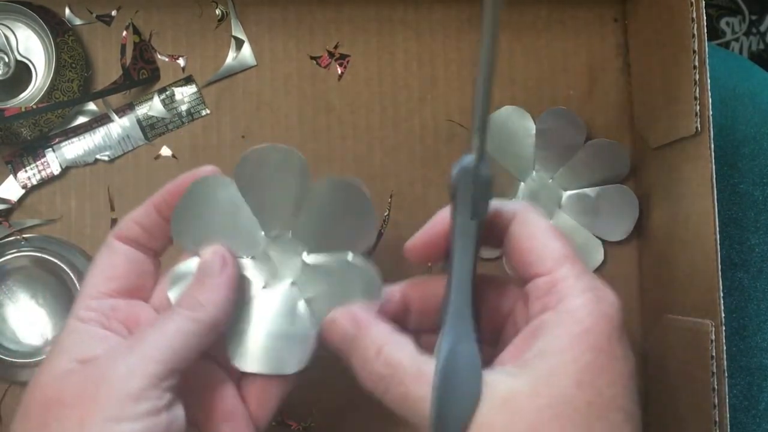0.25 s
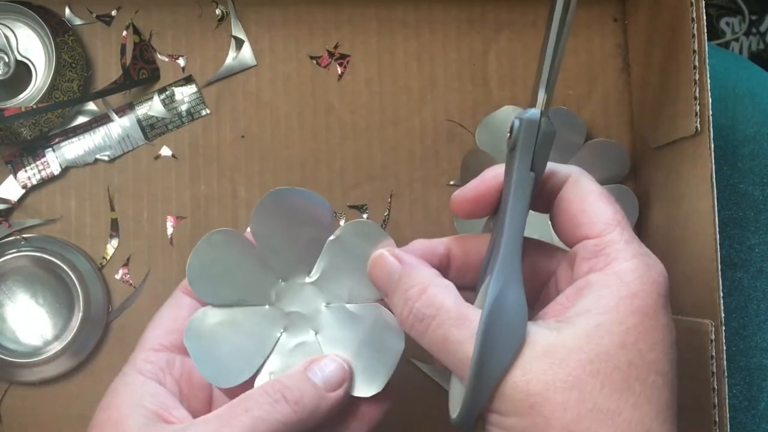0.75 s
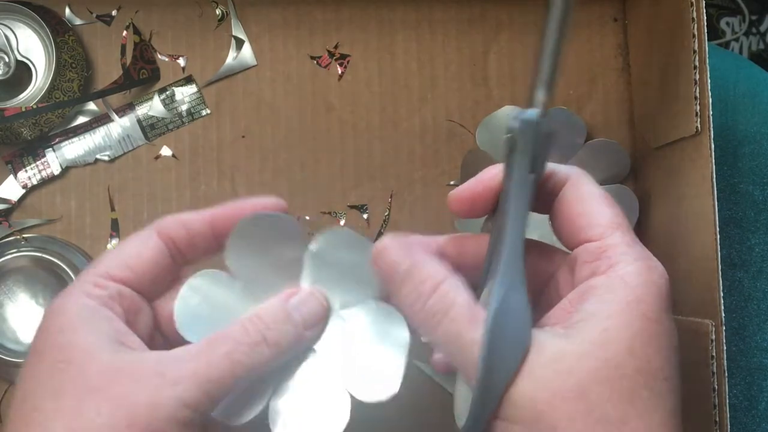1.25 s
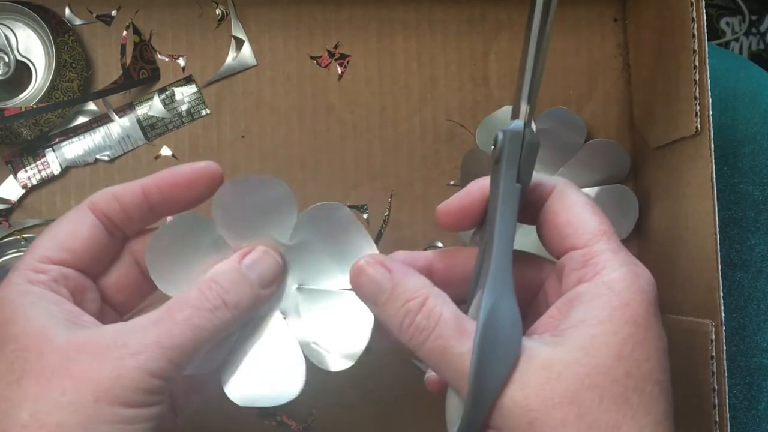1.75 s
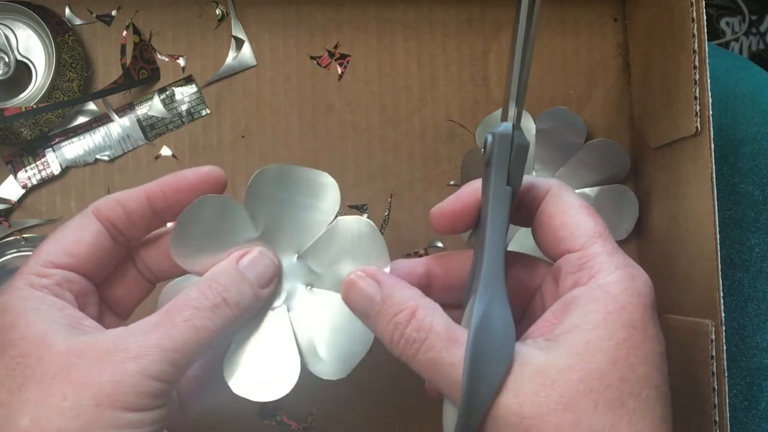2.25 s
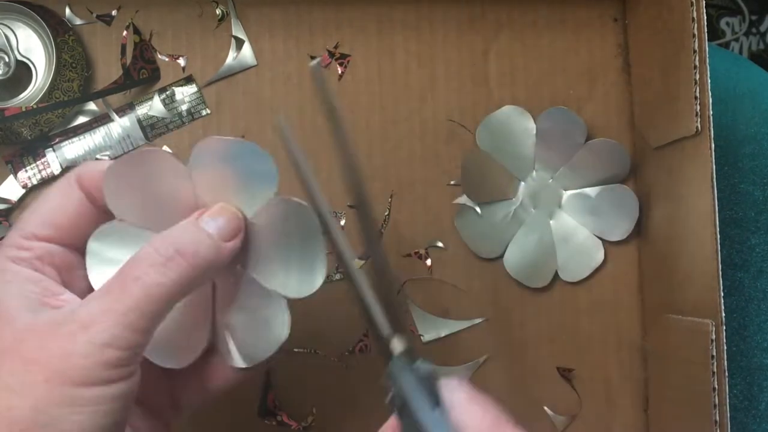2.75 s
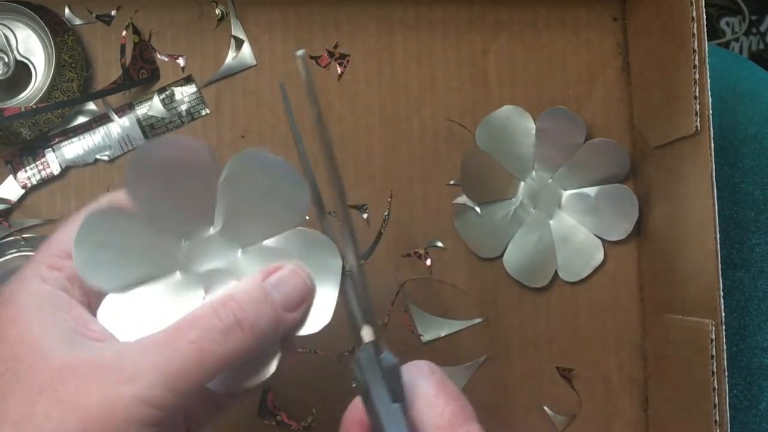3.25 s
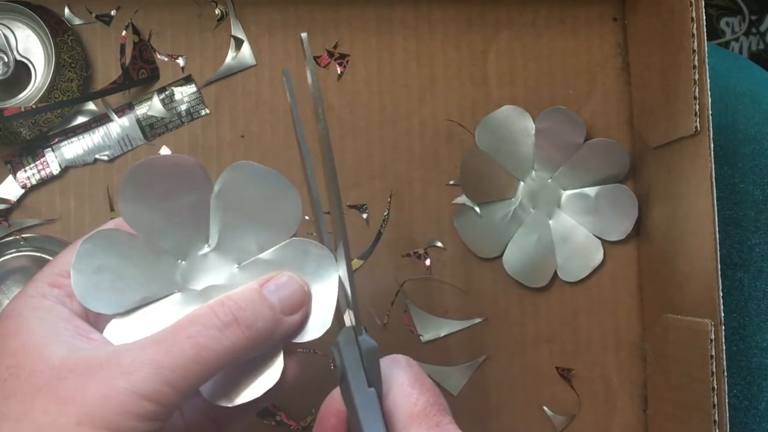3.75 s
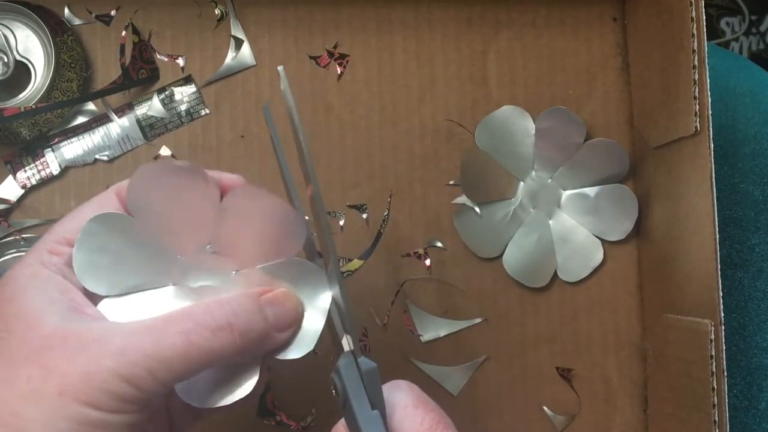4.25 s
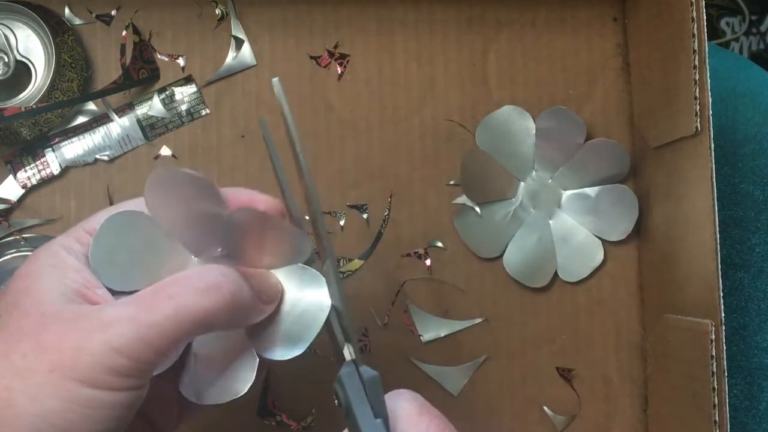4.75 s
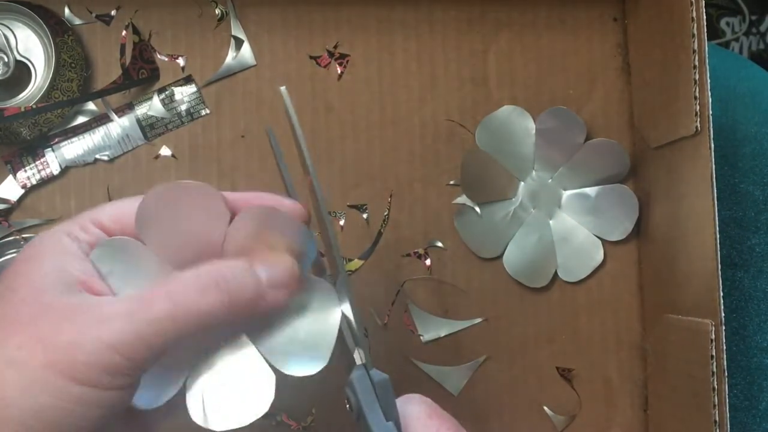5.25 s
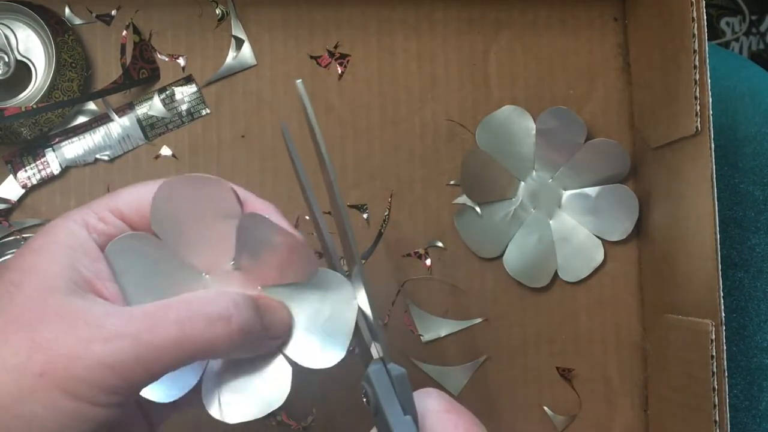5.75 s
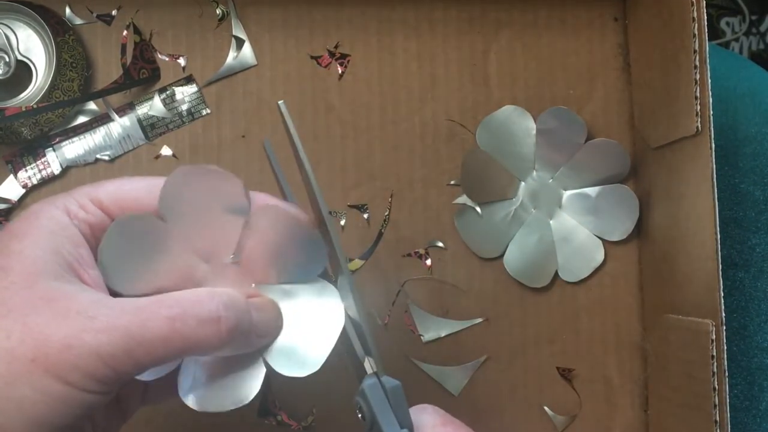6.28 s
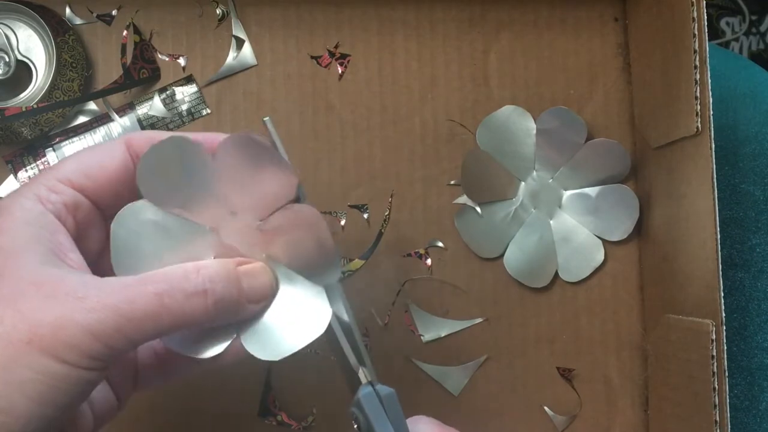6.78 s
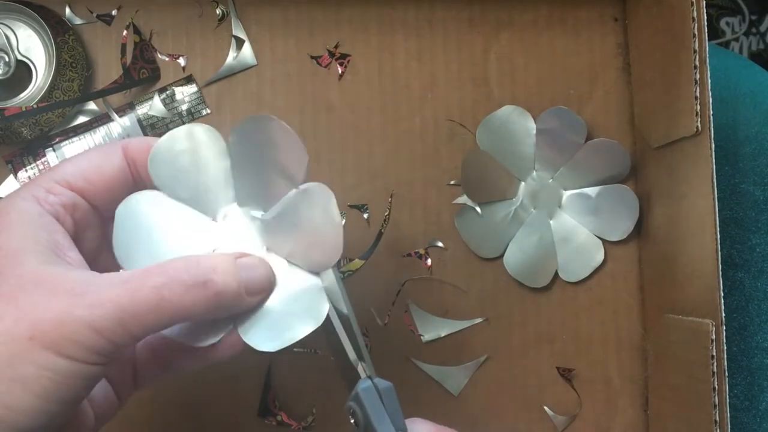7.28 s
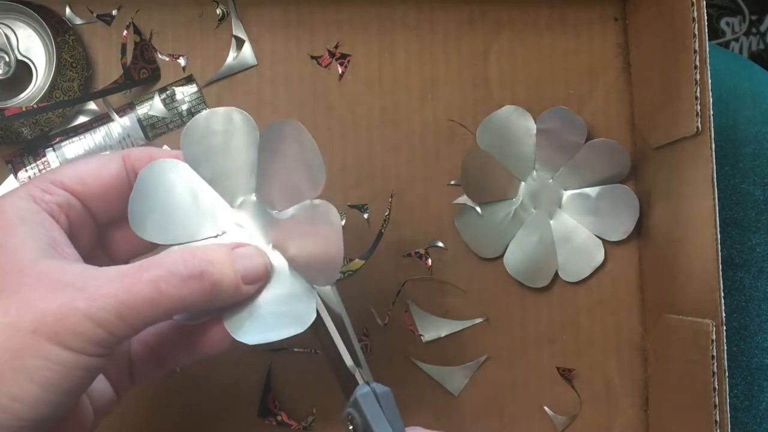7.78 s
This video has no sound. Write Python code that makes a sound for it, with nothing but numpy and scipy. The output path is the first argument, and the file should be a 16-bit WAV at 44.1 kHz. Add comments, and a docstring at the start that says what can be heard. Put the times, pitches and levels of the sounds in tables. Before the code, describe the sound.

Close up in a quiet room with a steady low drone and faint wavering hum, thin aluminium is handled and trimmed with scissors. Sparse light ticks come first, then a busy clatter of snaps and rubs near three seconds with a soft hand drag and dull bump on cardboard. Fine crackling follows, one very loud snip, a few strong snaps, and finally ratchety blade clicks.

```python
"""A steady drone and a low, wavering hum fill a quiet room; thin aluminium rubs and crackles at once.
Hands turn a flower of the sheet over a cardboard tray and trim its petals with scissors: snaps, ticks
and rubs drive shared resonances of sheet and scissors, and the tray adds a short diffuse echo.
Skin slides on the cardboard and a hand bumps the table as a low decaying swing; near the end the
blades pry through in stick-slip, each slip a click that rings decaying modes."""
import sys
import numpy as np
from scipy import signal
from scipy.fft import rfft, irfft, next_fast_len
from scipy.io import wavfile

SR = 44100
rng = np.random.default_rng(int(sys.argv[2]) if len(sys.argv) > 2 else 0)


def bounce(signal):
    """Save signal as a 16-bit WAV file at the path given by the first command-line argument."""
    frames = np.transpose(np.atleast_2d(signal))
    limited = np.clip(frames, -1, 1)
    pcm = np.round(limited * 32767).astype(np.int16)
    wavfile.write(sys.argv[1], SR, pcm)


N = 353682

# Upper resonances of sheet and scissors: (frequency [Hz], width [Hz], level [dB])
UPPER_MODES = [(5477, 630, 1.5), (5630, 170, -3), (5840, 300, -4.5), (6340, 100, 0.5), (6650, 530, 1),
               (7040, 200, -2.5), (7470, 290, 0)]


def amp(db):
    """Logarithmic level: 20 dB is a factor of ten in amplitude."""
    return 10 ** (np.asarray(db) / 20)


def rms_one(x):
    """Power normalisation: scale to rms 1."""
    return x / np.sqrt(np.mean(x ** 2) + 1e-20)


def level_in_time(rows):
    """Linear interpolation of (time [s], level [dB]) to one level per sample."""
    times, levels_db = np.transpose(rows)
    return np.interp(np.arange(N) / SR, times, levels_db)


def drift(rate_hz):
    """Slow random modulation: noise through two equal low-pass poles, rms 1."""
    step = 200     # samples
    steps = rng.standard_normal(N // step + 2)
    r = np.exp(-2 * np.pi * rate_hz * step / SR)
    slow = signal.lfilter([1], [1, -2 * r, r * r], steps)
    return np.interp(np.arange(N) / step, np.arange(len(steps)), rms_one(slow))


def resonate(x, hz, width_hz):
    """Damped resonance: a pole pair; steady white noise of rms 1 comes out at rms 1."""
    r = np.exp(-np.pi * width_hz / SR)
    gain = np.sqrt((1 - r * r) / 2)
    poles = [1, -2 * r * np.cos(2 * np.pi * hz / SR), r * r]
    return signal.lfilter([gain, 0, -gain], poles, x + 1e-18)     # the offset avoids denormals


def grit():
    """Friction noise: tiny slips of uneven size give noise with sharp outliers."""
    spread_db = 3.14
    size_db = spread_db * np.minimum(rng.exponential(1, N), 6.5)
    return rms_one(rng.standard_normal(N) * amp(size_db))


def stroke(height, length):
    """Sliding contact: samples and envelope of a force that swells and lets go."""
    swell = 0.58 * length     # part before the height
    first = max(round((height - swell) * SR), 0)
    at = np.arange(first, round((height - swell + length) * SR))
    return at, np.interp(at / SR - height, [-swell, 0, length - swell], [0, 1, 0])


def room():
    """Spectral shaping and resonance: coloured noise, its steady bands and a wavering hum."""
    # Noise colour: (frequency [Hz], relative density [dB per Hz])
    noise_colour = [(20, -15.5), (55, 2), (75, -1), (105, -9), (150, -3), (330, -5), (450, -13), (700, -9),
                    (1250, -19.5), (2800, -29.5), (7600, -32), (12000, -33), (15600, -39.5)]
    # Noise rms: (time [s], level [dB])
    noise_level = [(0, -57), (.8, -60), (2, -59.5), (2.84, -58), (4.1, -59.5), (8.02, -58.5)]
    # Drone bands: (frequency [Hz], width of each of two passes [Hz], rms level [dB])
    drone_bands = [(648, 100, -62.5), (569, 33, -69), (1072, 240, -73), (2027, 1300, -77), (3290, 330, -80),
                   (4390, 180, -84), (9660, 520, -81), (10860, 450, -92)]
    # Hum tones: (frequency [Hz], rms level before the waver [dB])
    hum_tones = [(120, -67), (179, -69), (240, -69), (302, -80.5)]
    hum_waver_db = 2.5

    size = next_fast_len(N)
    bins_hz = np.maximum(np.arange(size // 2 + 1) * SR / size, 1)
    points_hz, density_db = np.transpose(noise_colour)
    colour = amp(np.interp(np.log(bins_hz), np.log(points_hz), density_db))
    noise = rms_one(irfft(rfft(rng.standard_normal(size)) * colour, size)[:N])

    white, drone = rng.standard_normal(N), np.zeros(N)
    for hz, width_hz, db in drone_bands:
        band = resonate(resonate(white, hz, width_hz), hz, width_hz)
        drone += amp(db) * rms_one(band)

    t, hum = np.arange(N) / SR, np.zeros(N)
    for hz, db in hum_tones:
        level = np.sqrt(2) * amp(db + hum_waver_db * drift(2.0))
        hum += level * np.sin(2 * np.pi * hz * t + 1.2 * drift(2.5))
    return amp(level_in_time(noise_level)) * noise + drone + hum


def crackle():
    """Shot noise: sparse random ticks of the held sheet, each a few milliseconds of force."""
    # Tick force: (time [s], level [dB])
    tick_level = [(0, -76), (3.5, -94), (4.1, -68), (5.9, -69), (6.1, -70), (6.45, -76), (6.9, -88),
                  (7.15, -75), (8.02, -75)]
    ticks_per_s, decay_s = 78, .003
    born = (rng.random(N) < ticks_per_s / SR) * amp(2.8 * rng.standard_normal(N))
    r = np.exp(-1 / (decay_s * SR))
    return amp(level_in_time(tick_level)) * signal.lfilter([1], [1, -r], born)


def mode_shares(modes, favoured_hz):
    """Modal excitation: how each contact (rows) spreads its power over the modes (columns)."""
    favour_db, favour_octaves = 8.5, 0.13     # the grip leaves some modes free to ring
    chance_db = 3
    hz, _, db = np.transpose(modes)
    octaves_away = np.log2(hz / np.array(favoured_hz)[:, None])
    near = np.exp(-(octaves_away / favour_octaves) ** 2)
    gains_db = db * (1 - near) + favour_db * near
    gains = amp(gains_db + chance_db * rng.standard_normal(near.shape))
    return gains / np.sqrt(np.sum(gains ** 2, axis=1, keepdims=True))


def group_levels(db, bright_db, knock_db, favoured_hz):
    """Contact stiffening: low, middle, upper and top levels [dB]; harder contacts reach higher."""
    usual_db, top_per_db = -45, 0.1985     # top modes equal upper ones at the usual level
    # a favoured top mode draws level from the upper modes to the top ones
    lean_db = 2.5 * (favoured_hz > UPPER_MODES[-1][0])
    top_db = db + lean_db + top_per_db * (db - usual_db)
    return [db + knock_db, db - bright_db, db - lean_db, top_db]


def metal():
    """Modal synthesis: snips snap, tear and die away, strokes rub; all drive the same modes."""
    # Snips and ticks: (time [s], level [dB], upper over middle modes [dB],
    # low modes over the level [dB], favoured mode [Hz], force die-away t60 [s])
    cuts = [(0.219, -44.5, 10, -26, 7370, 0.041), (1.1658, -44, 2.5, -5.5, 6400, 0.058),
            (1.1862, -49.5, 1, -27, 6590, 0.047), (1.207, -42, 0, -7, 3440, 0.038),
            (2.292, -57, 12, -30, 10100, .035), (2.4278, -49, 7, -25, 8900, 0.049),
            (2.4905, -44, 21, -30, 5500, 0.085), (2.6412, -39.5, 1, -8.5, 5880, 0.045),
            (2.8043, -43, 1.5, -11.5, 1660, 0.036), (2.8545, -57, 8.5, -32, 11600, .025),
            (2.9342, -42, -9, -6, 9100, 0.036), (2.9687, -53.5, 0, 5.5, 3030, 0.041),
            (2.9872, -36.5, -6, -15.5, 1430, 0.028), (3.1332, -51.5, 9, -33, 7300, .035),
            (3.166, -56, 9, -27, 8500, .03), (3.2144, -58, 0, -30, 3340, .025),
            (3.2259, -45, 11, -11, 9400, .04), (3.317, -49.5, 0, 12.5, 1350, 0.023),
            (3.403, -63, 5, -10, 10900, .03), (3.9802, -59, 6, -30, 6240, 0.067),
            (4.3654, -50.5, 7, -30, 12600, .04), (4.381, -56.5, -4, -30, 3450, 0.046),
            (4.4218, -59.5, -16.5, 15, 1780, 0.01), (4.468, -52, -1, -30, 11600, 0.037),
            (4.5017, -51.5, 3, -30, 6300, 0.035), (4.5217, -45.5, -3, -3, 11700, .045),
            (4.568, -62, -8, -30, 3800, 0.028), (4.795, -57, -9, -20, 1910, 0.028),
            (4.84, -59.5, -13.5, -30, 3400, .035), (4.9086, -45.5, -5, 0.5, 9400, 0.021),
            (4.9179, -50.5, -3, -28, 11900, 0.062), (5.1953, -60, -6.5, -34, 3340, 0.061),
            (5.244, -59, -1.5, -30, 2280, 0.017), (5.3208, -63, -5, -28.5, 1650, 0.14),
            (5.355, -16, -0.5, -11.5, 930, .027), (5.3621, -20.5, 8.5, -19.5, 11800, 0.022),
            (5.4009, -54, -12.5, -26.5, 2970, .03), (5.4115, -51, -8, -9, 2980, 0.028),
            (5.4232, -54.5, -14.5, -32, 2780, .03), (5.6045, -56, -3, -32, 2940, 0.024),
            (6.1363, -44, 1.5, -27, 6170, 0.017), (6.354, -53, 1, -18, 8100, 0.037),
            (6.3746, -58.5, -7, -10, 5150, 0.035), (6.5131, -30.5, 5, 0, 432, 0.043),
            (6.5245, -49, -6.5, -30, 5790, 0.063), (6.803, -62, -8, -30, 12300, 0.036),
            (6.8236, -34, -1, -33, 3450, 0.029), (7.2456, -50.5, -0.5, -11, 3090, 0.04),
            (7.2933, -52.5, -23.5, 10.5, 3000, 0.028), (7.5886, -57, -3, -30, 3350, 0.066),
            (7.7293, -56, 1, -10, 6990, .045)]
    # Rubs on blades and fingers: (time of height [s], length [s], level [dB],
    # upper over middle modes [dB], favoured mode [Hz])
    rubs = [(0.038, 0.13, -67, 15, 8500), (0.299, 0.12, -51, 10, 8750), (0.39, 0.34, -64, 12, 6850),
            (2.305, .1, -69.5, 2, 6340), (2.499, 0.092, -58.5, 7, 5200), (2.543, 0.32, -67.5, -1, 5160),
            (2.732, 0.23, -58, 4.5, 12900), (2.825, .06, -52, -3.5, 3060), (2.894, 0.085, -46, 15, 5650),
            (2.921, 0.03, -45.5, 8.5, 9650), (2.978, .025, -42.5, -4, 3280),
            (2.994, 0.021, -24.5, 17, 6700), (3.014, 0.38, -62, 0.5, 8600), (3.153, .045, -68, -7, 9500),
            (3.231, 0.052, -56, 1.5, 5170), (3.274, 0.052, -62.5, 1, 6150), (3.331, .04, -72, -23.5, 2260),
            (3.431, 0.058, -61.5, -1.5, 1390), (4.026, 0.06, -54.5, 18, 11600),
            (4.066, 0.15, -58.5, 1, 6700), (4.205, 0.03, -69, -1, 6430), (4.479, 0.043, -45, 11, 11900),
            (4.572, 0.13, -64.5, 1.5, 11400), (4.672, 0.082, -54.5, 1.5, 7600),
            (4.848, 0.028, -50.5, 9, 13300), (4.9, 0.034, -60, -2, 5640), (4.965, 0.034, -45, 5.5, 11700),
            (5.008, 0.079, -51.5, 2, 9400), (5.063, 0.036, -47, 4.5, 8600), (5.233, .1, -60.5, 1, 8700),
            (5.401, 0.045, -51.5, -0.5, 2220), (5.546, 0.09, -62, 2, 6400),
            (5.632, 0.084, -61.5, -0.5, 3210), (5.743, 0.1, -53.5, 2.5, 3040),
            (5.833, 0.059, -72, -7, 3050), (5.91, 0.074, -80, -13, 2690), (6.256, 0.13, -59, -0.5, 6800),
            (6.71, 0.038, -67, -3, 3520), (7.043, 0.015, -60.5, 17.5, 13900), (7.125, 0.041, -69, 4, 12400),
            (7.286, 0.048, -59, -6, 3325), (7.34, 0.059, -54, 13, 12800), (7.496, 0.035, -56, 5.5, 2130),
            (7.652, 0.082, -54.5, 2.5, 8700), (7.757, 0.018, -60, 0, 3340), (7.795, 0.02, -63.5, -1, 3400)]
    # Resonances of sheet and scissors: (frequency [Hz], width [Hz], level [dB])
    low_modes = [(310, 64, -9), (402, 120, -3.5), (557, 50, -3), (705, 41, 0.5), (978, 68, -3.5)]
    middle_modes = [(1400, 100, -12.5), (1655, 260, -7), (1983, 160, -3.5), (2260, 100, -6),
                    (2845, 350, -4), (3103, 140, -0.5), (3464, 110, -3.5), (3750, 240, -3.5),
                    (4402, 770, -1.5)]
    top_modes = [(8040, 300, -5.5), (8760, 290, 1), (9100, 300, 1), (9920, 330, -2), (10530, 180, -4),
                 (11600, 1100, 4), (12040, 120, -11.5), (12400, 500, -2.5), (13200, 500, -4.5),
                 (13810, 900, -2.5), (14660, 600, 0.5), (15500, 850, -9.5)]
    rise_s, snap_db = .0005, 18     # the metal first breaks in one sharp click above the tearing

    slips, after, out = grit(), np.arange(SR // 8), np.zeros(N)
    uneven = amp(3.2 * drift(35))
    faint = crackle() * slips
    contacts = []
    for s, db, bright_db, knock_db, hz, t60 in cuts:
        at = round(s * SR) + after
        rise = np.minimum(after / SR / rise_s, 1)
        force = rise * amp(-60 * after / SR / t60) * slips[at]
        force[round(rise_s * SR)] += amp(snap_db)
        contacts.append((at, force, group_levels(db, bright_db, knock_db, hz), hz))
    for height, length, db, bright_db, hz in rubs:
        at, shape = stroke(height, length)
        levels_db = group_levels(db, bright_db, -np.inf, hz)     # light rubbing misses the low modes
        contacts.append((at, shape * uneven[at] * slips[at], levels_db, hz))

    favoured_hz = [contact[3] for contact in contacts]
    for group, modes in enumerate([low_modes, middle_modes, UPPER_MODES, top_modes]):
        shares = mode_shares(modes, favoured_hz)
        for k, (hz, width_hz, db) in enumerate(modes):
            drive = faint * amp(db) / np.sqrt(len(modes)) * (group > 0)     # no crackle in low modes
            for (at, force, levels_db, _), share in zip(contacts, shares[:, k]):
                drive[at] += share * amp(levels_db[group]) * force
            out += (-1) ** k * resonate(drive, hz, width_hz)     # neighbours alternate in sign
    return out


def tray(x):
    """Diffuse reflection: a short decaying-noise echo from the cardboard walls and the table."""
    echo_db, t60_s = -18, 0.17
    t = np.arange(SR // 4) / SR
    echo = rng.standard_normal(len(t)) * amp(-60 * t / t60_s) * (t > .002)
    echo /= np.sqrt(np.sum(echo ** 2))
    return amp(echo_db) * signal.fftconvolve(x, echo)[:N]


def slides():
    """Friction-driven resonance: skin drags over cardboard, grit into its dull modes."""
    # Hand slides: (time of height [s], length [s], force level [dB])
    drags = [(0.192, 0.23, -63.5), (3.234, 0.057, -61), (3.321, 0.039, -45), (3.351, 0.096, -48.5),
             (3.4, 0.095, -57), (3.48, 0.12, -52.5)]
    # Cardboard resonances: (frequency [Hz], width [Hz], level [dB])
    cardboard_modes = [(177, 41, -3.5), (333, 46, -5), (760, 69, -7), (1340, 200, -36), (2190, 55, -16.5),
                       (2700, 32, -46)]
    force = np.zeros(N)
    for height, length, db in drags:
        at, shape = stroke(height, length)
        force[at] += amp(db) * shape
    force *= grit()
    return sum(amp(db) * resonate(force, hz, width_hz) for hz, width_hz, db in cardboard_modes)


def bumps():
    """Damped oscillation: a hand's soft pushes on the table, low swings that swell and decay."""
    # Pushes: (time [s], level before swell and decay [dB], pitch [Hz], t60 [s])
    pushes = [(3.219, -40, 59.2, 0.12), (3.316, -26, 56.5, 0.09), (3.33, -34.5, 77, 0.12),
              (3.348, -41, 72, 0.12), (3.43, -24, 78, 0.041), (3.47, -42.5, 82, 0.085),
              (3.529, -38, 71, 0.082)]
    out, t = np.zeros(N), np.arange(SR // 4) / SR
    for s, db, hz, t60 in pushes:
        start = round(s * SR)
        swell = np.minimum(t * hz, 1)     # over one period
        out[start:start + len(t)] += amp(db - 60 * t / t60) * np.sin(2 * np.pi * hz * t) * swell
    return out


def blades():
    """Stick-slip: slips at uneven gaps, each a click that sets the blade modes ringing."""
    # Prying spells: (start [s], end [s], first slip level [dB], last slip level [dB])
    spells = [(7.316, 7.375, -43.5, -52), (7.38, 7.423, -55, -52), (7.438, 7.484, -50, -54.5),
              (7.496, 7.527, -54, -51), (7.594, 7.665, -52, -50)]
    # Blade modes, dull then bright: (frequency [Hz], level [dB], t60 [s])
    dull_modes = [(2030, -17.5, 0.074), (2230, -3.5, 0.022), (3210, -4.5, 0.016), (3390, -16, 0.037)]
    bright_modes = [(4660, -13, .01), (5100, -22, .05), (7150, -6, 0.016), (8460, -7, 0.018),
                    (11600, -6, .006), (12500, -4, .008), (13400, -14, .006)]
    gap_s, gap_spread = 0.0067, .25     # median gap, spread of its natural logarithm
    bright_db, chance_db = -7.5, 4.5

    modes, out = dull_modes + bright_modes, np.zeros(N)
    for start, end, first_db, last_db in spells:
        chance = rng.standard_normal((64, 1 + len(modes)))
        gaps = gap_s * np.exp(gap_spread * chance[:, 0])
        s = start + np.cumsum(gaps) - gaps[0]
        slip_db = np.where(s < end, np.interp(s, [start, end], [first_db, last_db]), -np.inf)
        at = (np.minimum(s, end) * SR).astype(int)
        for k, (hz, db, t60) in enumerate(modes):
            mode_db = db + chance_db * chance[:, 1 + k] + bright_db * (k >= len(dull_modes))
            clicks = np.zeros(N)
            clicks[at] = amp(slip_db + mode_db)
            r, w = amp(-60 / (t60 * SR)), 2 * np.pi * hz / SR
            out += signal.lfilter([0, np.sin(w)], [1, -2 * r * np.cos(w), r * r], clicks + 1e-18)
    return out


def scene():
    """Superposition: all sources add at one microphone above the tray."""
    cutting = metal() + blades()
    return (room() + cutting + tray(cutting) + slides() + bumps())[None]


def record(dry):
    """Band limiting: the microphone drops the deepest bass; the top is cut steeply."""
    cutoff_hz = 15900
    body = signal.sosfilt(signal.butter(2, 28, "high", fs=SR, output="sos"), dry)
    return signal.sosfilt(signal.ellip(10, .5, 70, cutoff_hz, fs=SR, output="sos"), body)


dry = scene()
out = record(dry)
bounce(out)
```